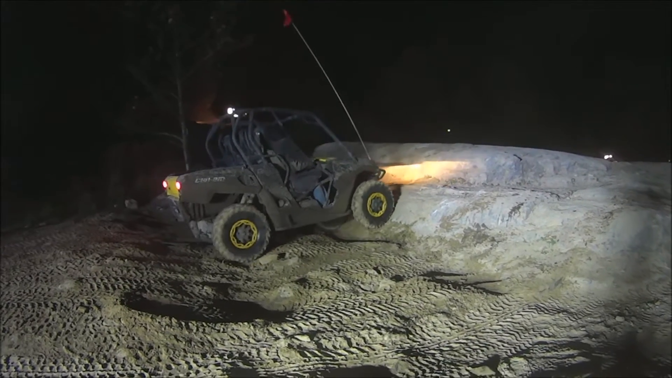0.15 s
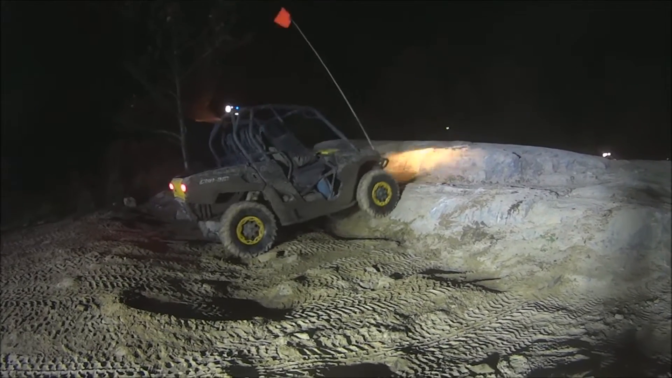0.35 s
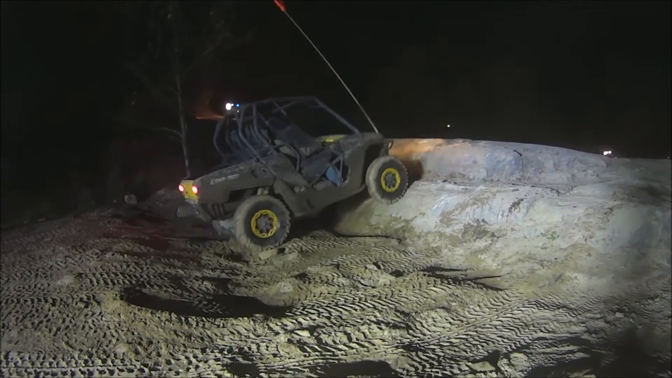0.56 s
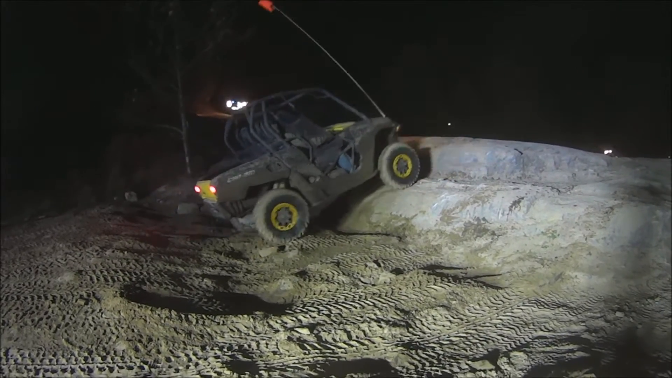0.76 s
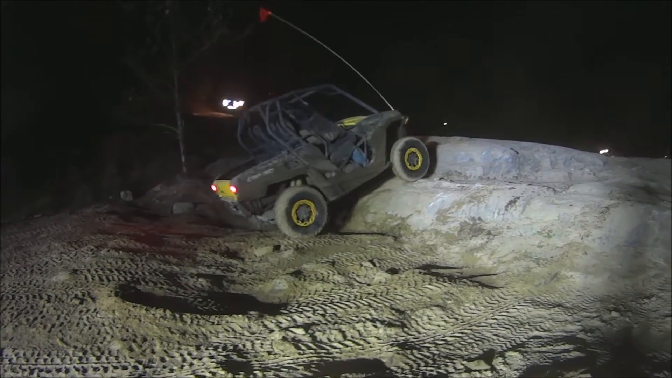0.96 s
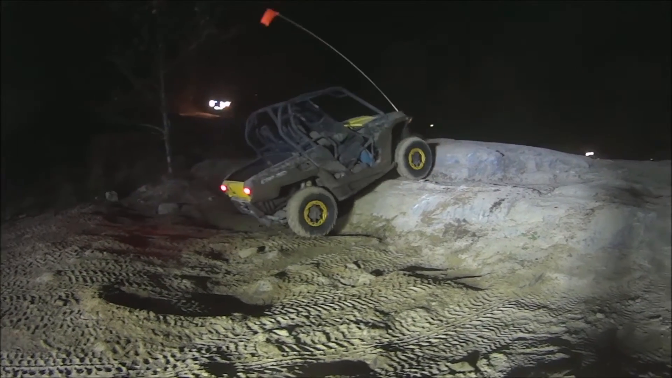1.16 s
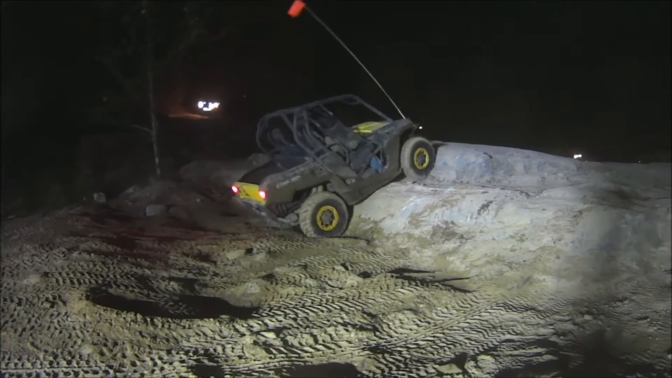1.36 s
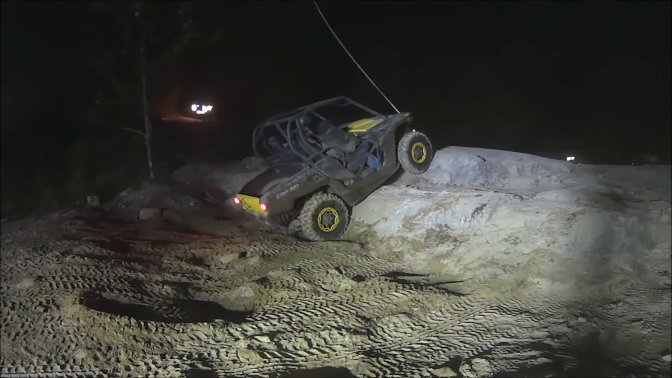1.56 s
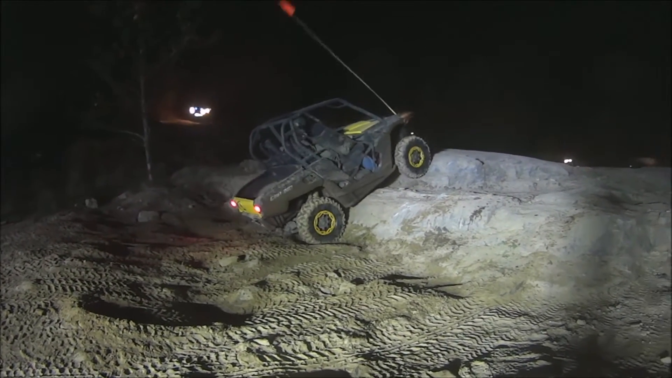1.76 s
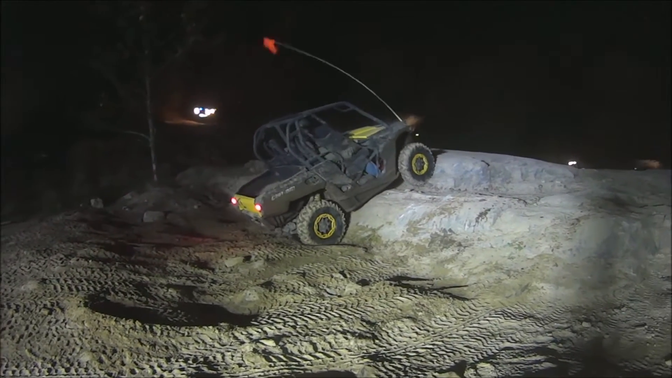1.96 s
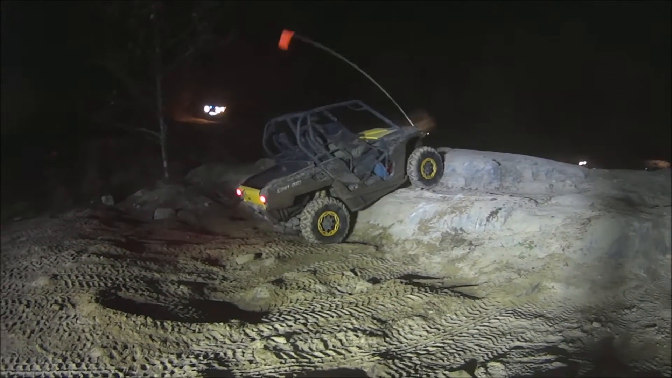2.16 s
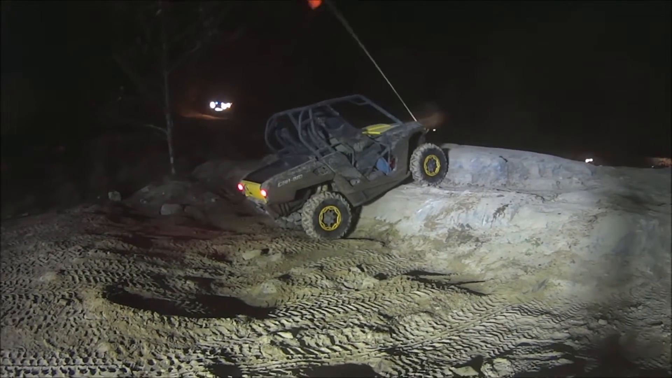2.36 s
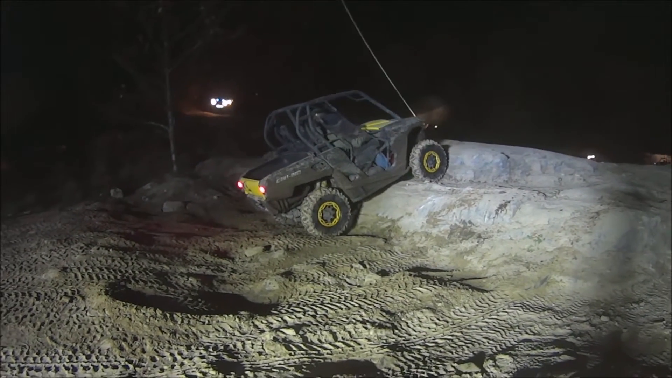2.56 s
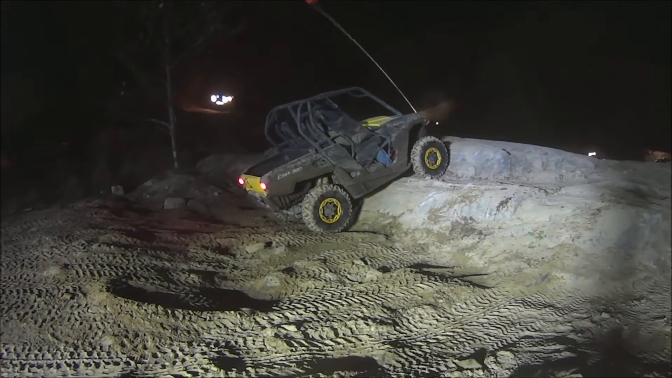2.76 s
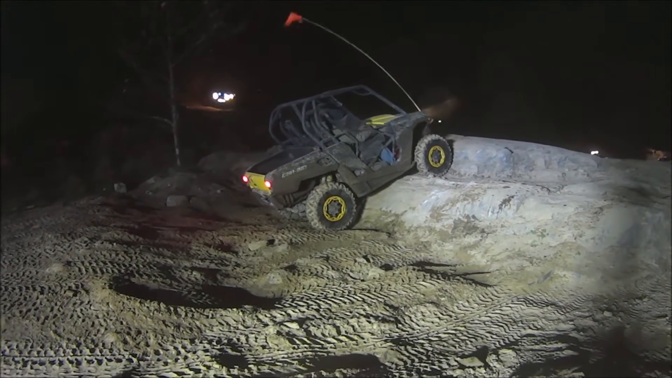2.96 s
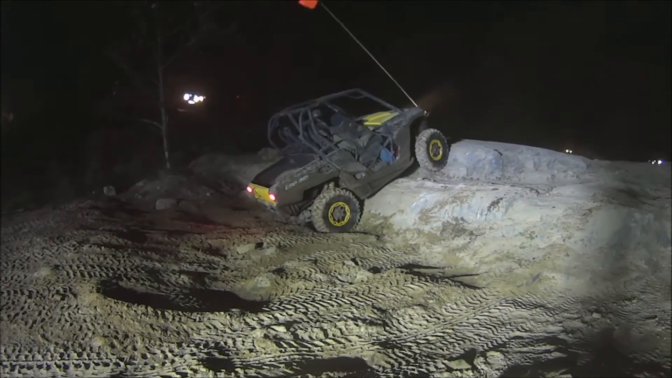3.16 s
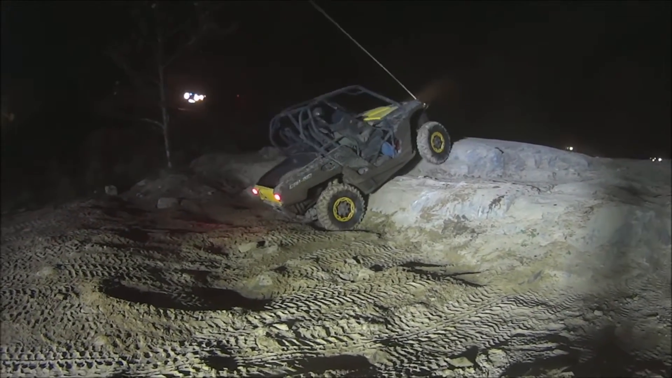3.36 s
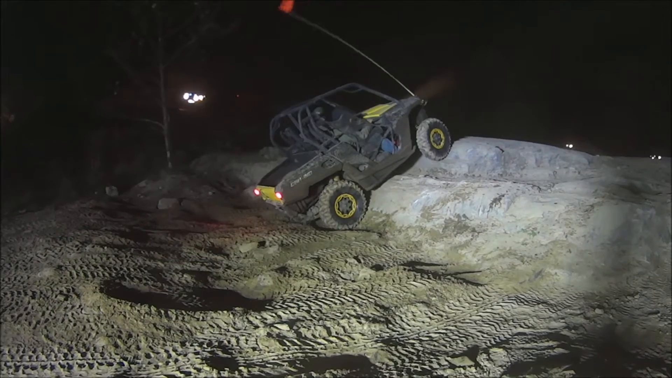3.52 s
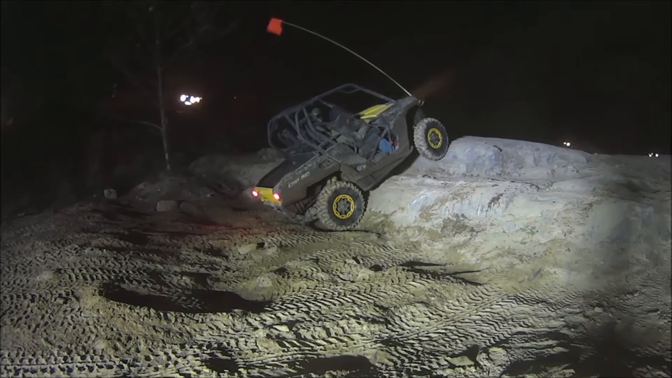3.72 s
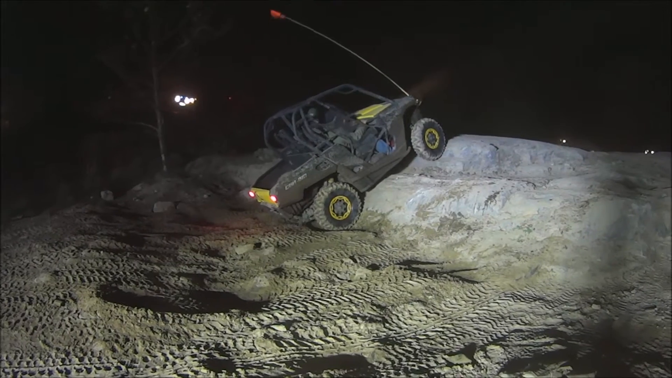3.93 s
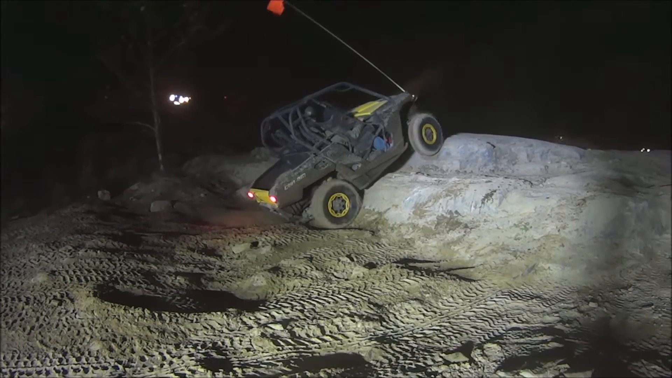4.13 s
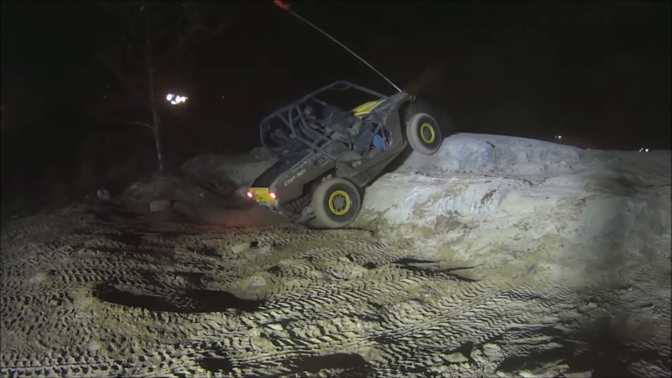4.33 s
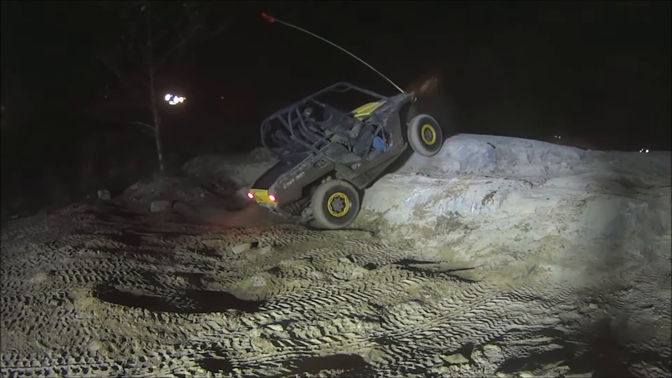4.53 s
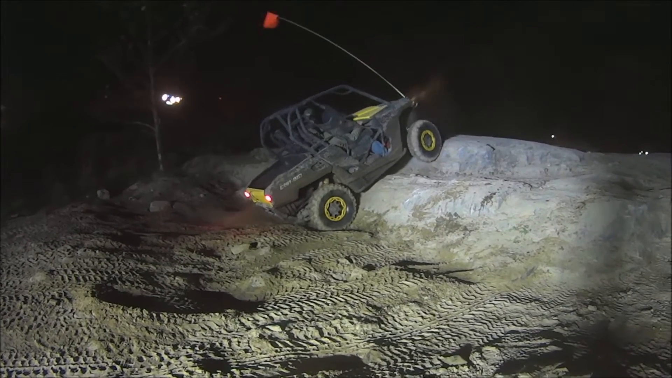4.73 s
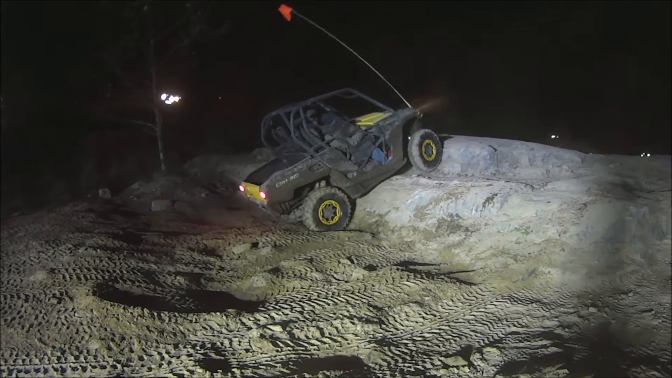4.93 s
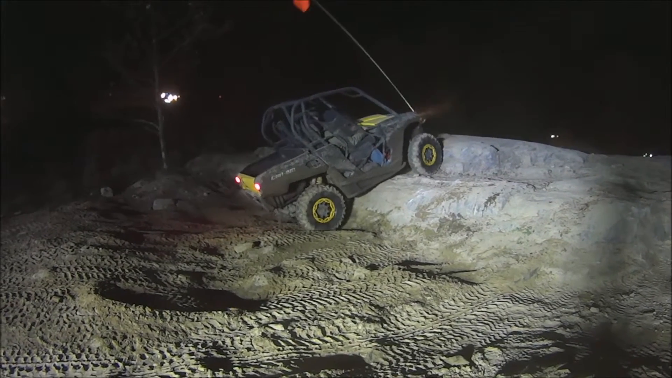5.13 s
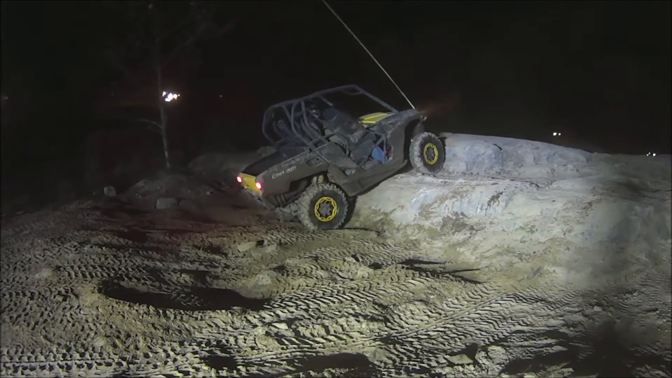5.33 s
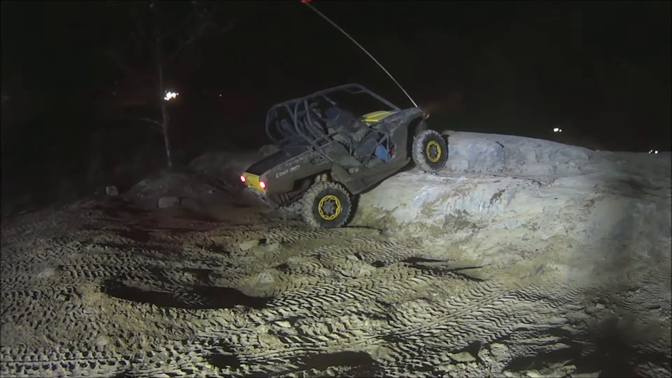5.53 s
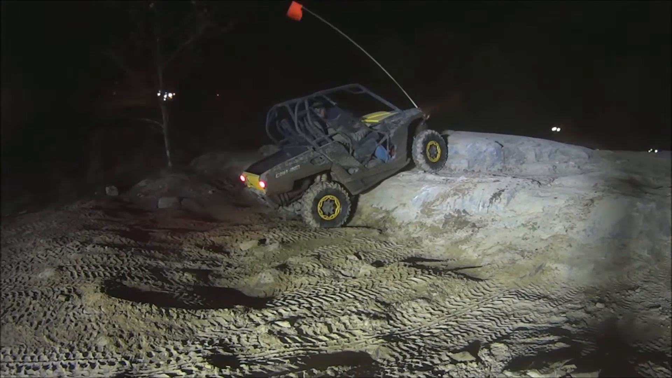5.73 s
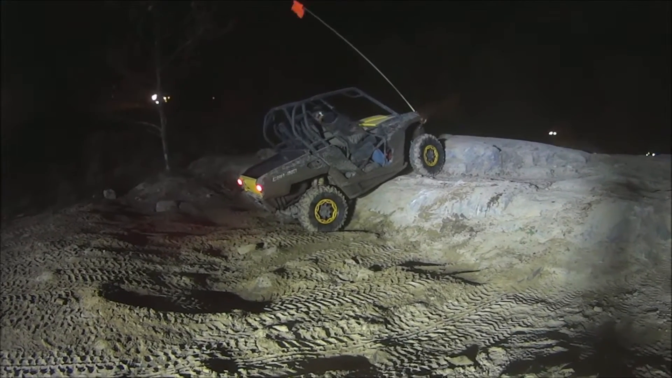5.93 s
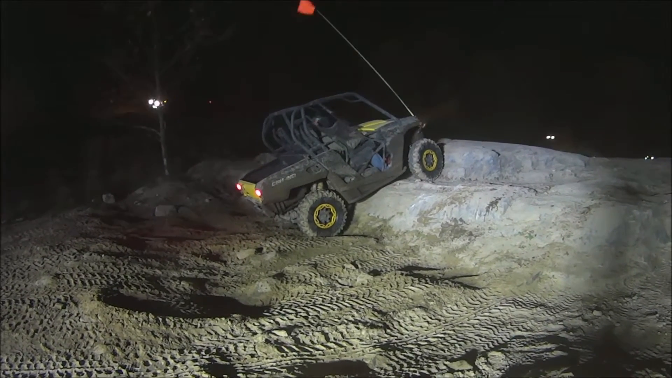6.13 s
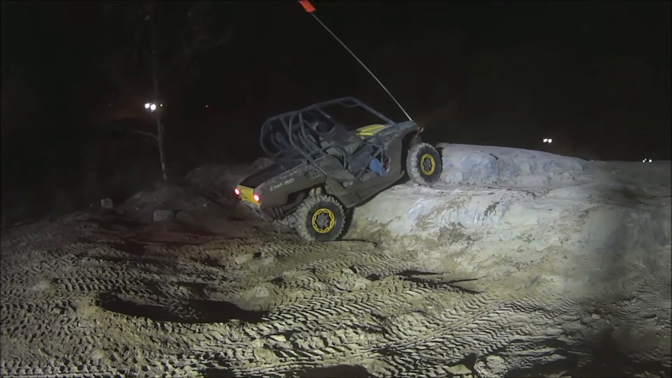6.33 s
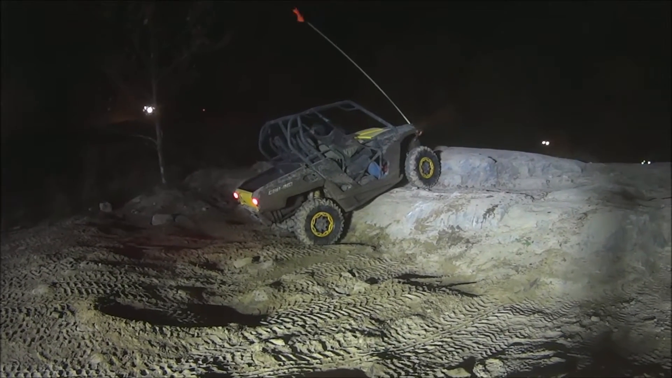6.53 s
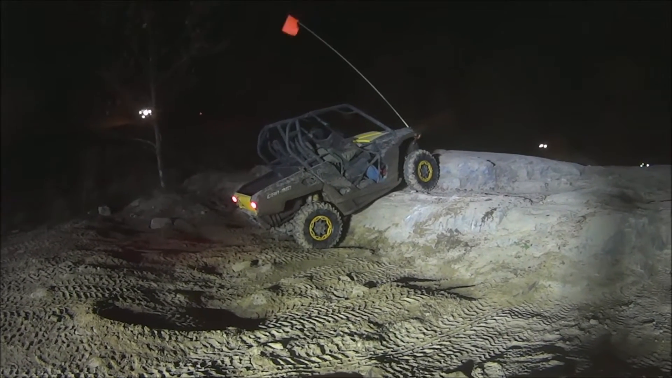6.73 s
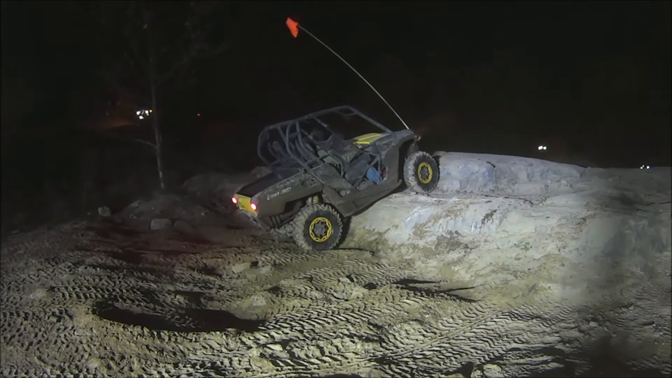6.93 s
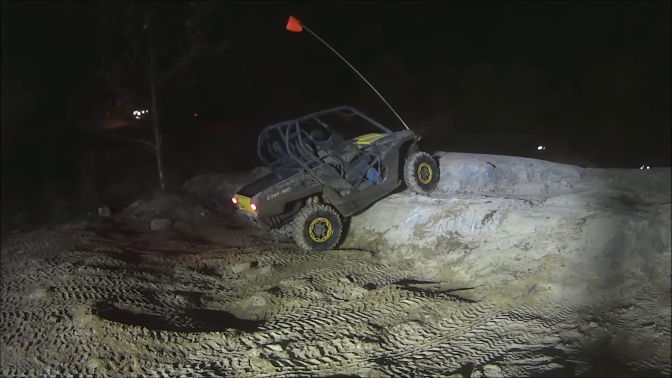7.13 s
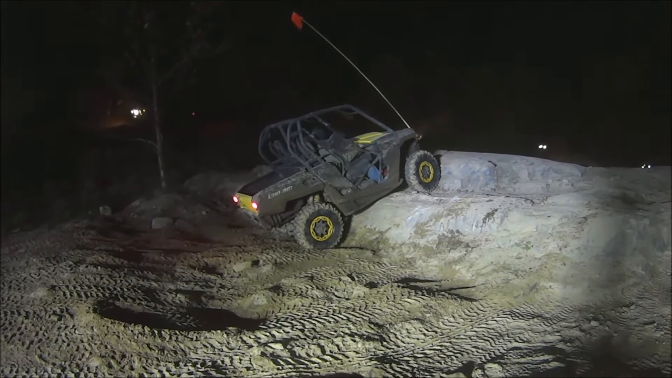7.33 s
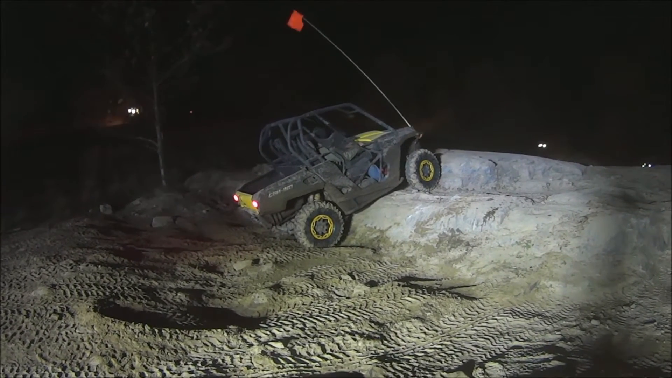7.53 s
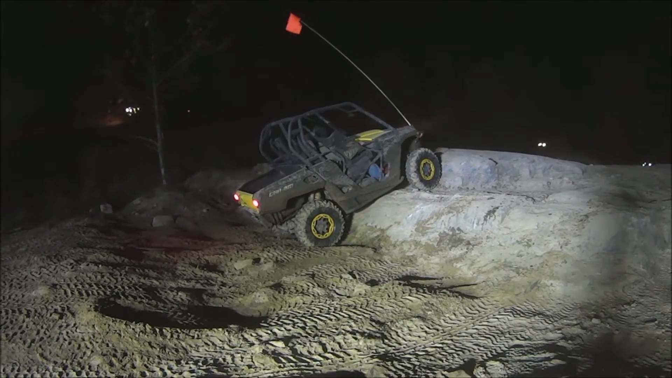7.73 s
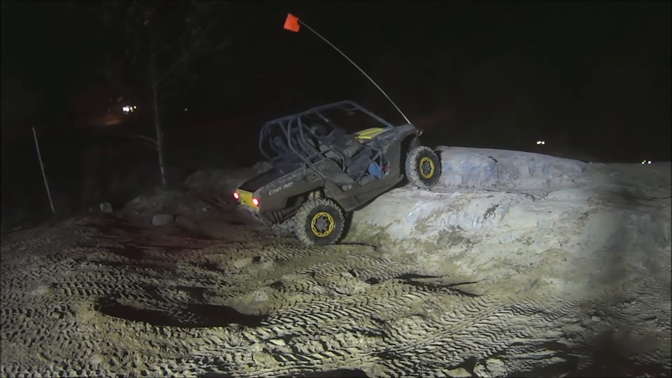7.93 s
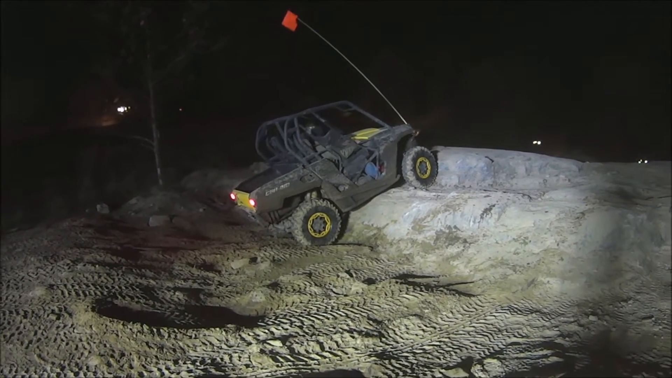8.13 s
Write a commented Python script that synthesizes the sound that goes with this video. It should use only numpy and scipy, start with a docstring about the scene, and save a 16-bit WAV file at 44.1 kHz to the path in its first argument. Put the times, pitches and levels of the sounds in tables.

```python
"""An off-road buggy revs twice and idles in between as it claws at a rock ledge some metres away.
Its two cylinders fire unevenly and make the muffler boom. Stones knock, its belly grinds on the rock,
tyres squeak as they stick and slip, and a far hum wavers. It is all heard through a small camera whose
housing rings, mostly between 1 and 5 kHz, and whose two sound openings (ports) are out of phase."""
import sys
import numpy as np
from scipy import signal
from scipy.fft import rfft, irfft, next_fast_len
from scipy.io import wavfile
from scipy.ndimage import uniform_filter1d

SR = 44100
rng = np.random.default_rng(int(sys.argv[2]) if len(sys.argv) > 2 else 0)


def unload_wav(signal):
    """Save mono or channel-first audio to the path in sys.argv[1] as 16-bit WAV at rate SR, clipped to [-1, 1]."""
    wavfile.write(
        sys.argv[1],
        SR,
        np.round(np.clip(np.atleast_2d(signal).T, -1, 1) * 32767).astype(np.int16),
    )


N = 360738
TIME = np.arange(N) / SR
SIZE = next_fast_len(N + SR // 4)  # spare room for ringing to die away
BINS_HZ = np.arange(SIZE // 2 + 1) * SR / SIZE


def engine(scatter_db=1.5, jitter_cycles=.007, puff_depth=.2, rumble_db=-4):
    """Two uneven firings a cycle ring the muffler; valves clatter, the throttle roars, tyres grind grit."""
    # engine cycles a second: t/s, f/Hz
    speed = [(0.0, 22.4), (0.25, 22.6), (0.43, 24.0), (0.75, 25.8), (1.0, 29.2), (1.07, 28.5), (1.25, 24.6),
             (1.5, 13.2), (1.7, 10.8), (2.41, 10.7), (3.1, 10.5), (3.25, 23.6), (3.39, 24.6), (3.76, 25.9),
             (3.99, 31.4), (4.275, 47.0), (4.4, 44.5), (4.5, 43.5), (4.71, 22), (4.92, 11.4), (5.1, 10.6),
             (6.2, 10.4), (7.54, 10.5), (8.18, 10.3)]
    # how hard the engine works: t/s, load (0 idling, 1 flat out), exhaust level/dB
    effort = [(0.0, 0.55, -42), (0.48, 0.61, -45), (0.8, 0.73, -41), (1.09, 0.68, -38.5), (1.2, 0.46, -46),
              (1.4, 0.64, -50), (1.75, 0.15, -47.5), (2.3, 0.11, -51), (3.212, 0.0053, -50.5),
              (3.24, 0.39, -45.5), (3.51, 0.53, -43), (3.87, 0.56, -37.5), (3.96, 0.86, -32.5),
              (4.03, 0.82, -41.5), (4.14, 0.98, -34.5), (4.24, 1, -32.5), (4.43, .95, -41.5),
              (4.51, 0.68, -35.5), (4.62, 0.69, -38), (4.76, 0.36, -52), (5.15, 0.17, -49.5),
              (6.0, 0.015, -50.5), (8.18, 0.014, -51)]
    # second cylinder beside the first: cycle rate/Hz, gain (below 0 the pulse is flipped)
    second_cylinder = [(10, .5), (22, .8), (30, .9), (38, .1), (45, -.4)]
    # strength of the throttle's roar: cycle rate/Hz, relative level/dB
    throttle = [(10.5, -61), (24, -56), (30, -49), (36, -41.5), (47, -37.5)]
    # the muffler's resonances: f/Hz, width/Hz, relative level/dB
    muffler_tones = [(56, 22, -14), (95, 24, -2), (117, 24, -1), (139, 26, 0)]
    second_fires, longer_pipe_s = .432, .0017  # cylinder two: share of the cycle, delay in its longer pipe
    hz = np.interp(TIME, *np.transpose(speed))
    times, *columns = np.transpose(effort)
    load, exhaust_db = (np.interp(TIME, times, column) for column in columns)
    clatter_db = np.interp(load, (0, .5, 1), (-51, -40, -29))
    grit_db = np.interp(load, (0, .5, 1), (-64, -56, -42))
    roar_db = np.interp(hz, *np.transpose(throttle))
    cycles = np.cumsum(hz) / SR
    count = int(cycles[-1]) + 1
    chance = rng.standard_normal((count, 4))
    slowness = hz.min() / hz  # burning is least even at idle
    pulses = np.zeros(N)
    for k, start in enumerate((0, second_fires)):
        due = np.arange(count) + start
        stray = jitter_cycles * chance[:, k] * np.interp(due, cycles, slowness)
        fire_s = np.interp(due + stray, cycles, TIME) + k * longer_pipe_s
        at = np.minimum(fire_s * SR, N - 1).astype(int)
        strength = np.interp(hz[at], *np.transpose(second_cylinder)) if k else 1
        pulses[at] += strength * undb(scatter_db * np.sqrt(slowness[at]) * chance[:, 2 + k])
    pulses /= np.sqrt(hz)  # power stays even as firings crowd
    chambers = sum((-1) ** k * undb(db) * ring(f, width) for k, (f, width, db) in enumerate(muffler_tones))
    muffler = chambers * ring(95.4, 63)
    rumble = undb(rumble_db) * np.sqrt(slowness) * unit(shaped(rng.standard_normal(N), muffler))
    exhaust = (unit(shaped(pulses, muffler)) + rumble) * undb(exhaust_db)
    soft_pulses = unit(shaped(pulses, 1 / (1 + 1j * BINS_HZ / 15)))
    puffs = unit(1 + puff_depth * soft_pulses.clip(-1, 3))  # clatter and roar swell with each firing
    clatter = spread(puffs * undb(clatter_db + 1.5 * walk(13) + 1.6 * walk(60)), ring(1450, 1740))
    grit = spread(undb(grit_db + 1.14 * walk(30)), undb(14) * ring(5600, 8300) ** 2)
    tailpipe = ring(205, 130) * ring(240, 600)
    bark_gain = undb(roar_db - 1 + 4.5 * walk(45)) * (1 - slowness)  # firings crack at high revs
    bark = unit(shaped(pulses, tailpipe)) * bark_gain
    roar = spread(puffs * undb(roar_db), undb(13) * ring(330, 690))
    return exhaust + clatter + bark + roar + grit


def knocks(rise_s=.00086, fall_60db_s=.11, trim_db=-7, tick_db=5, tick_s=.00066):
    """Stone and metal hit rock: a tick and a fading burst of grit over a dull thud of the frame."""
    # blows, with relative levels: t/s, level/dB, thud/dB, bright ring/dB
    blows = [(0.073, -31, -38, -8), (0.14, -25, -26, -15.5), (0.2129, -27.5, -18, -27),
             (1.029, -27, -31, -19), (1.185, -16.5, -42, -23), (1.366, -23.5, -17.5, -16.5),
             (1.4275, -15.5, -20, -24), (1.4382, -9.5, -21.5, -35), (1.4525, -13.5, -34, -20.5),
             (1.4643, -12, -27, -34), (1.4747, -12.5, -17.5, -24), (1.4897, -11, -37, -29),
             (1.5095, -21.5, -9.5, -15), (1.556, -11, -23.5, -24.5), (1.5764, -13.5, -24, -31),
             (1.5997, -15.5, -20.5, -21), (1.668, -23.5, -18.5, -20), (1.714, -26, -14, -25),
             (1.7785, -28.5, -16, -28), (1.9903, -27.5, -24, -23), (2.0497, -27.5, -26, -46),
             (2.186, -37.5, -28, -12), (2.5476, -32.5, -16, -20), (3.4695, -36, -13, -28),
             (4.192, -17.5, -22, -23), (4.7546, -30, -40, -33), (4.7905, -22.5, -19, -20.5),
             (4.819, -27.5, -20, -19), (4.892, -25.5, -22, -25), (4.9219, -19.5, -22, -19),
             (5.0467, -29.5, -21, -20.5), (5.327, -44, -15, -7), (5.3606, -43, -3.5, -3.5),
             (5.39, -49, 7.5, -16), (5.4266, -24, -22, -38), (6.2984, -33, -23, -36),
             (6.7174, -45.5, -18, -5), (6.755, -33, -33, -33), (6.8973, -33, -18, -31),
             (7.092, -33.5, -34, -37), (7.413, -34.5, -23, -25), (7.467, -37.5, -26, -27),
             (7.5194, -32, -23, -19.5)]
    power = np.zeros((3, N))
    for start, db, thud_db, ring_db in blows:
        span = slice(int(start * SR), int((start + .3) * SR))
        age = (TIME[span] - start).clip(0)
        blow_db = db + trim_db - 60 * age / fall_60db_s + tick_db * np.exp(-age / tick_s)
        blow = undb(blow_db) * (1 - np.exp(-age / rise_s))
        power[:, span] += np.outer(undb([0, thud_db, ring_db]), blow) ** 2
    grit, thud, bright = np.sqrt(power) * undb(.5 * walk(250))
    frame = spread(thud, undb(29) * ring(191, 173) ** 2)
    return frame + spread(grit, ring(1210, 2500)) + spread(bright, undb(22.5) * ring(5000, 4000) ** 2)


def scrapes():
    """Rough bands of noise swell and fade: the belly grinds, grit scrapes, a short growl."""
    # swells of noise: t/s, length/s, centre f/Hz, width/Hz, relative level/dB
    swells = [(1.406, 0.085, 1470, 3020, -30), (1.423, 0.25, 410, 900, -30.5),
              (2.13, 0.22, 3120, 5000, -43.5), (2.427, 0.23, 2660, 3000, -42.5),
              (4.33, 0.13, 680, 220, -15.5), (5.5, 0.27, 4100, 6000, -43.5)]
    out, rough = 0, undb(2.57 * walk(65))
    for start, length, hz, width_hz, db in swells:
        swell = np.sin(np.pi * ((TIME - start) / length).clip(0, 1))
        out = out + spread(undb(db) * swell * rough, ring(hz, width_hz) ** 2)
    return out


def squeaks(waver=.011, rasp_db=3.5):
    """Rubber sticks and slips on rock: a short, rough tone that bends in pitch."""
    # slips: t/s, length/s, first f/Hz, middle f/Hz, last f/Hz, level/dB, change to odd harmonics/dB
    slips = [(0.595, .15, 1043, 1039, 1030, -39.5, -31), (.78, 0.36, 651, 752, 742, -52.5, -20),
             (1.686, 0.12, 1057, 1043, 1022, -41.5, -15), (1.985, .045, 996, 995, 990, -61, 3),
             (2.13, .05, 1045, 1040, 1025, -53, -20), (2.22, .06, 997, 997, 995, -64, 12),
             (2.414, 0.079, 984, 970, 990, -55.5, -11), (5.512, 0.12, 952, 1004, 900, -53.5, 4)]
    # harmonics 1 to 5 (multiples of the pitch): relative level/dB
    harmonics = [-10, 0, -4, -5, -8]
    out = np.zeros(N)
    drift, rough = 1 + waver * walk(220), undb(rasp_db * walk(120))
    for start, length, first_hz, middle_hz, last_hz, db, odd_db in slips:
        span = slice(int(start * SR), int((start + length) * SR))
        progress = (TIME[span] - start).clip(0) / length
        arch = np.sin(np.pi * progress ** .65).clip(0)  # peaks early, droops slowly
        ends_hz = np.where(np.arange(len(arch)) < arch.argmax(), first_hz, last_hz)
        hz = (ends_hz + arch * (middle_hz - ends_hz)) * drift[span]
        phase = 2 * np.pi * np.cumsum(hz) / SR
        tone = sum(undb(level + odd_db * (k % 2)) * np.sin(k * phase) for k, level in enumerate(harmonics, 1))
        out[span] += undb(db) * np.sqrt(arch) * rough[span] * tone
    return out


def hum(sag_s=.4, fade_s=.07, waver_db=2.5):
    """A low tone from far off sags in pitch and wavers in level."""
    # spells of humming: t/s, length/s, first f/Hz, settled f/Hz, level/dB
    spells = [(1.22, .5, 65.4, 54, -53.5), (2.197, 1.07, 67, 54.4, -65), (5.404, 2.6, 67.9, 55.1, -60)]
    out, waver = 0, undb(waver_db * walk(5))
    for start, length, first_hz, settled_hz, db in spells:
        age = (TIME - start).clip(0)
        fade = np.clip(np.minimum(age, length - age) / fade_s, 0, 1)
        hz = settled_hz + (first_hz - settled_hz) * np.exp(-age / sag_s)
        out = out + fade * undb(db) * np.sqrt(2) * np.sin(2 * np.pi * np.cumsum(hz) / SR)
    return out * waver


def undb(db):
    """Turn a level in dB into a gain."""
    return 10 ** (np.asarray(db) / 20)


def unit(x):
    """Scale x to an average power of 1."""
    return x / np.sqrt(np.mean(x ** 2))


def over_hz(table):
    """Read a table of f/Hz, value at every frequency, on a log axis."""
    hz, value = np.transpose(table)
    return np.interp(np.log(BINS_HZ + 1), np.log(hz + 1), value)


def shaped(x, gain):
    """Filter x with one gain for each frequency."""
    return irfft(rfft(x, SIZE) * gain, SIZE)[..., :N]


def ring(hz, width):
    """The filter of one resonance, with gain 1 at its centre."""
    damping = 1j * BINS_HZ * width
    return damping / (hz ** 2 - BINS_HZ ** 2 + damping)


def walk(rate):
    """A smooth random wobble of size about 1, with `rate` new values a second."""
    hold = int(SR / rate)
    steps = np.repeat(rng.standard_normal(N // hold + 1), hold)
    return unit(uniform_filter1d(uniform_filter1d(steps, hold), hold)[:N])


def spread(envelope, colour):
    """Filtered noise that follows a loudness curve, partly the same at both ports and partly not."""
    # sound that reaches both ports alike: f/Hz, share of the power
    alike = [(200, 1), (800, 0.79), (1600, 0.95), (2500, 0.98), (3800, 0.96), (4400, 0.71), (5000, 0.98),
             (6000, 0.67), (10000, 0.6)]
    noise = rfft(envelope * rng.standard_normal((3, N)), SIZE)
    share = np.clip(over_hz(alike), 0, 1)
    ports = np.sqrt(share) * noise[0] + np.sqrt(1 - share) * noise[1:]
    return irfft(colour * ports, SIZE)[:, :N]


def scene():
    """Everything in the open air, at the two ports."""
    return engine() + hum() + knocks() + scrapes() + squeaks()


def record(dry, hiss_db=-52.5, shared_hiss=.29, top_hz=10950):
    """The housing colours the sound, the ports differ, the camera adds hiss and cuts the highest treble."""
    # the housing's broad tone: f/Hz, level/dB
    housing_tone = [(30, 2.5), (300, 1.5), (800, 1.5), (1150, 3.5), (2500, -15.5), (3900, -7), (4250, -11),
                    (6000, -18), (11000, -19)]
    # the housing's resonances: f/Hz, width/Hz, level/dB
    cavities = [(1488.5, 193, 19.5), (1759.5, 372, 18), (3024, 840, 3), (4900, 590, -1),
                (7600, 1000, -14.5), (9700, 1400, -15.5)]
    # how much louder left is than right: f/Hz, level/dB
    balance = [(100, -.3), (600, -0.5), (2000, -1.5), (2900, -1.5), (3800, -1), (4300, -2.5), (5200, -5.5),
               (5900, 2.5), (9700, -2.5)]
    # how far left runs ahead of right: f/Hz, phase/rad
    left_lead = [(40, -.35), (90, -.6), (180, -.85), (350, -1.4), (600, -2.1), (1700, -1.55), (2500, -1.9),
                 (3200, -1.6), (3960, -2.7), (4650, -.4), (5250, -.8), (5700, -2.), (6100, -1.2),
                 (10500, 0.)]
    # the colour of the hiss: f/Hz, relative level/dB
    hiss_colour = [(100, 16.5), (400, 1), (1000, -5), (3000, -3.5), (6000, -6), (11000, -9.5)]
    ringing = sum(undb(2 * db) * abs(ring(f, width)) ** 4 for f, width, db in cavities)
    power = undb(2 * over_hz(housing_tone)) + ringing
    cepstrum = irfft(np.log(power) / 2, SIZE)
    cepstrum[1:SIZE // 2] *= 2  # folded so the housing rings after a sound, never before
    cepstrum[SIZE // 2 + 1:] = 0
    housing = np.exp(rfft(cepstrum))
    left = undb(over_hz(balance) / 2) * np.exp(.5j * over_hz(left_lead))
    heard = shaped(dry, housing * np.array([left, 1 / left]))
    noise = rng.standard_normal((3, N))
    hiss = unit(shaped(shared_hiss * noise[0] + noise[1:], undb(over_hz(hiss_colour)))) * undb(hiss_db)
    treble_cut = signal.ellip(12, .2, 60, top_hz, fs=SR, output="sos")
    return signal.sosfilt(treble_cut, heard + hiss)


dry = scene()
out = record(dry)
unload_wav(out)
```